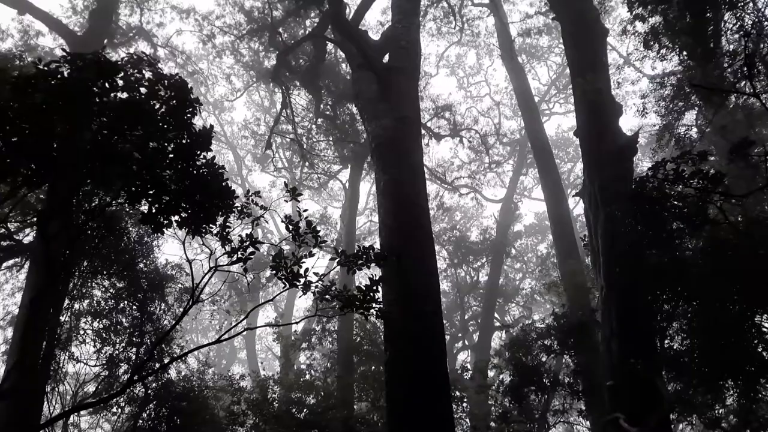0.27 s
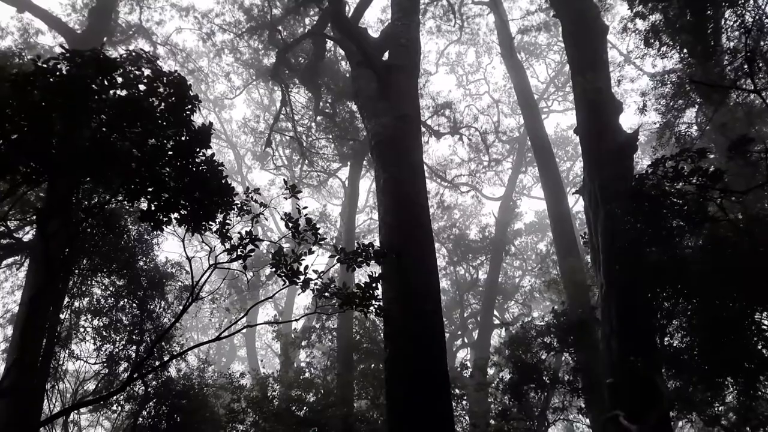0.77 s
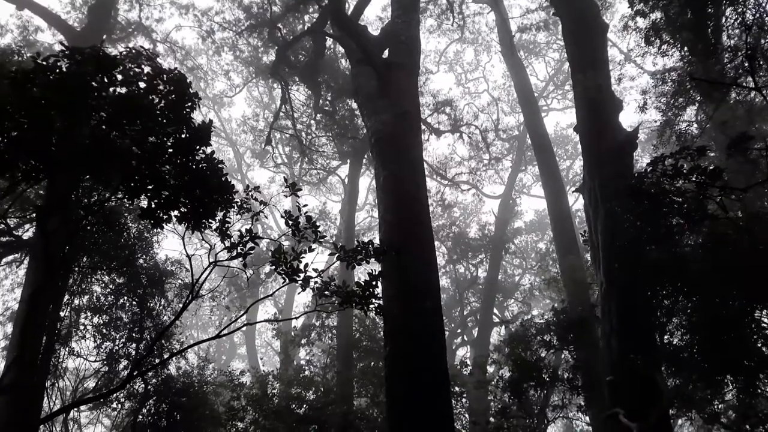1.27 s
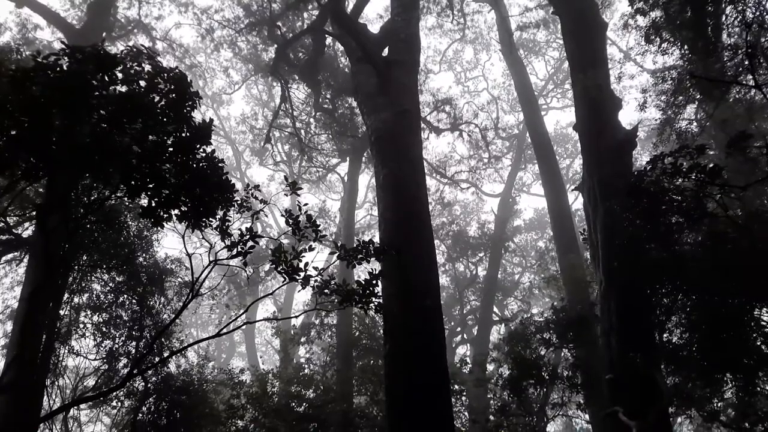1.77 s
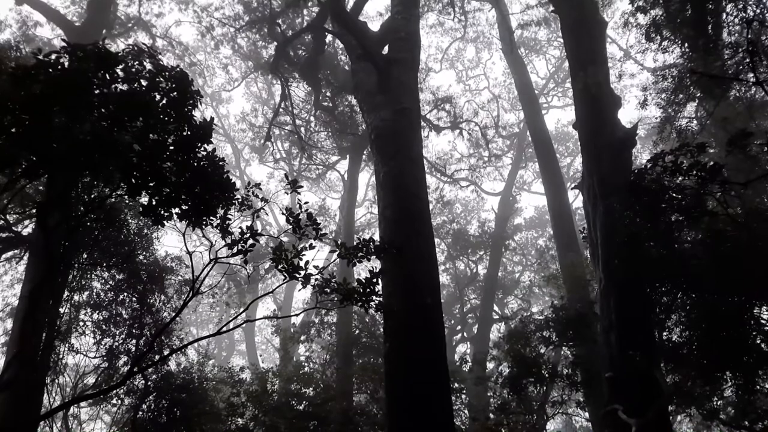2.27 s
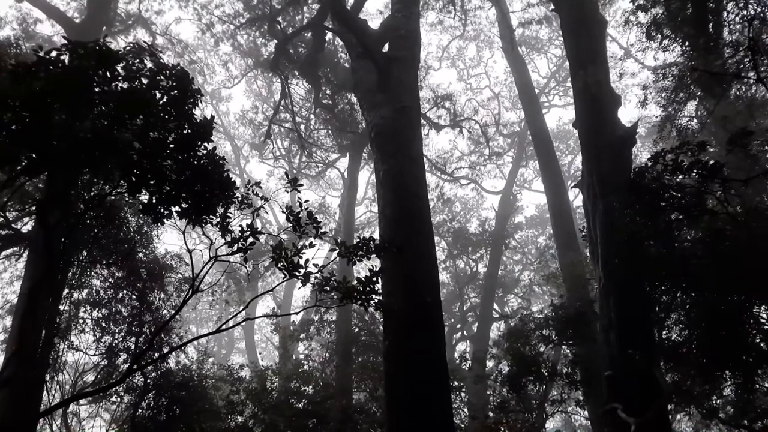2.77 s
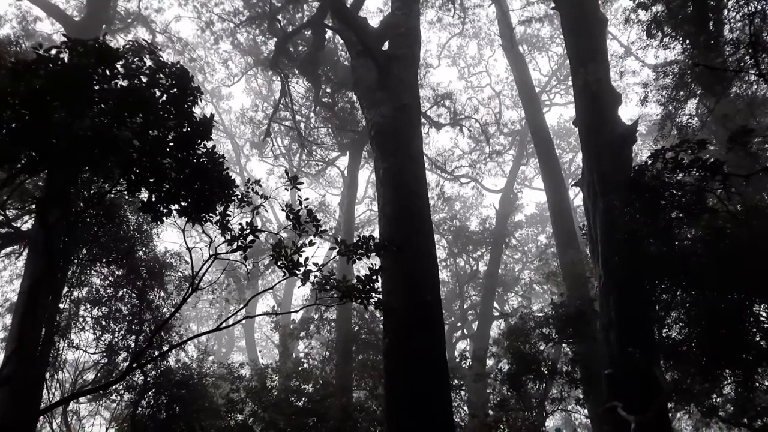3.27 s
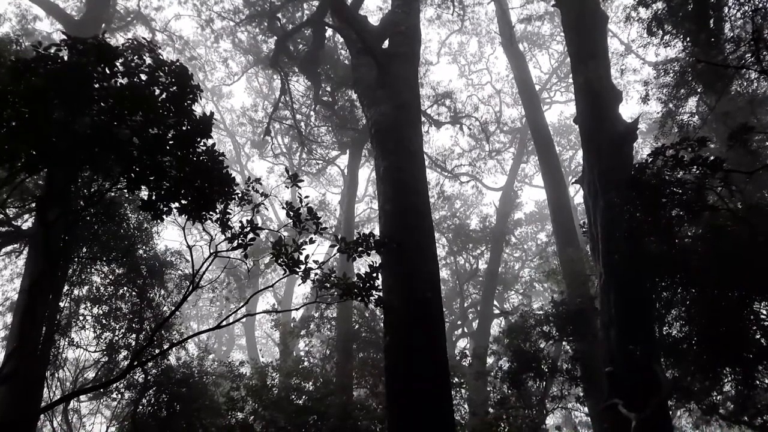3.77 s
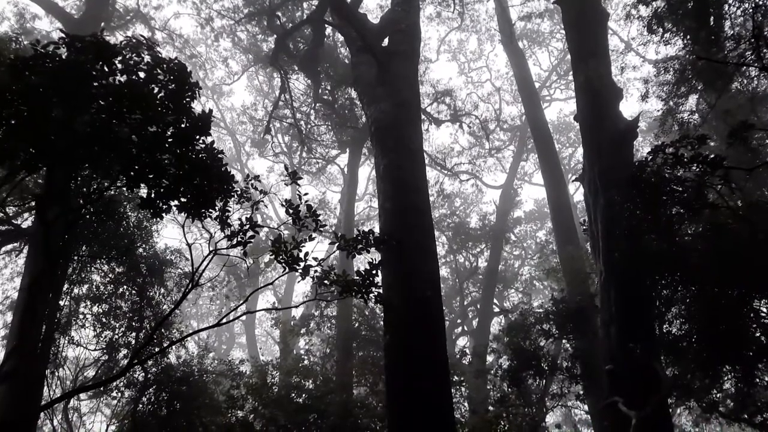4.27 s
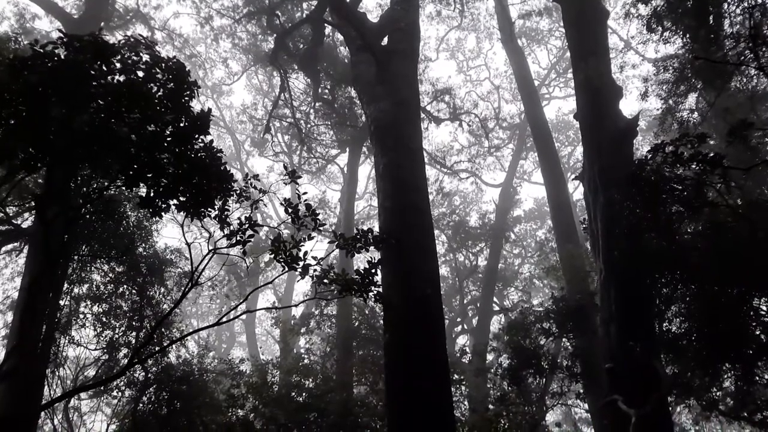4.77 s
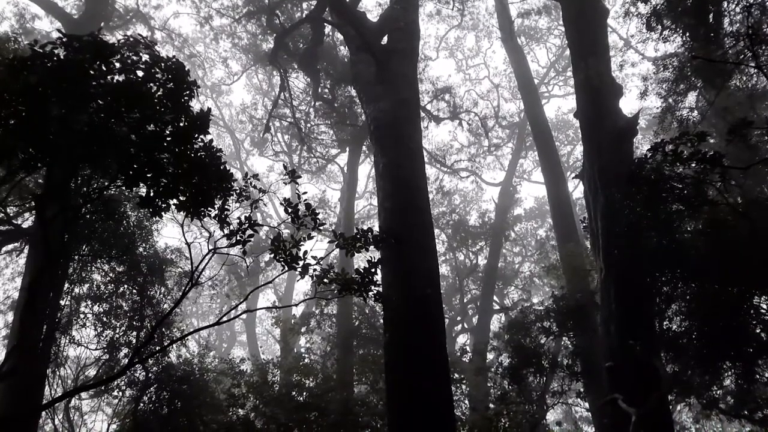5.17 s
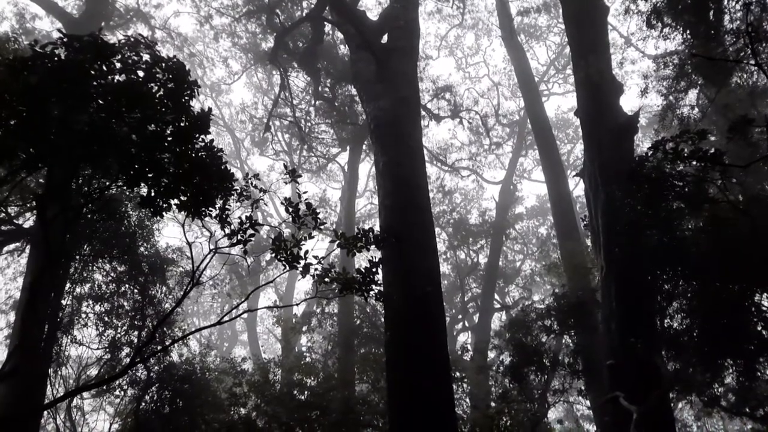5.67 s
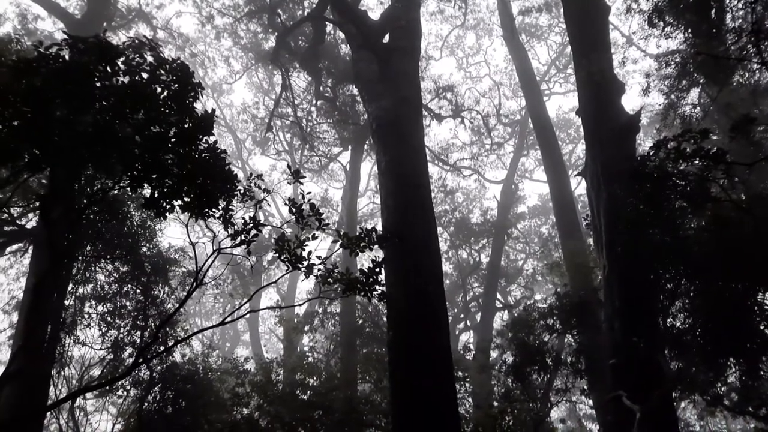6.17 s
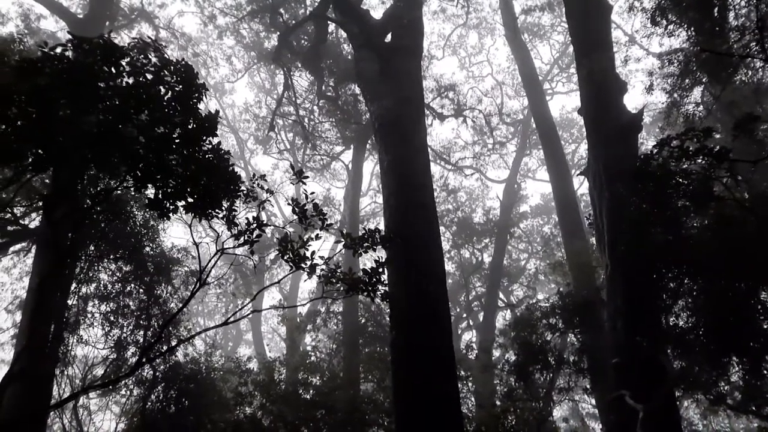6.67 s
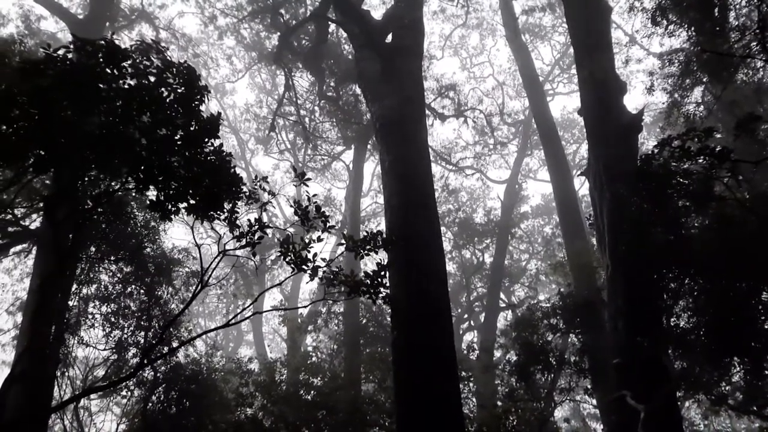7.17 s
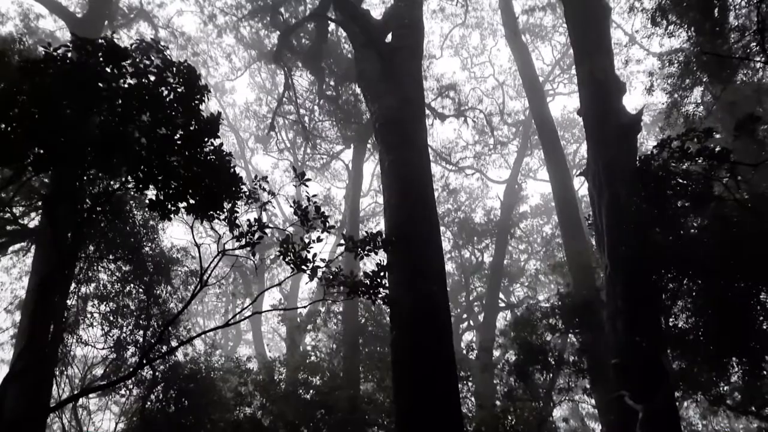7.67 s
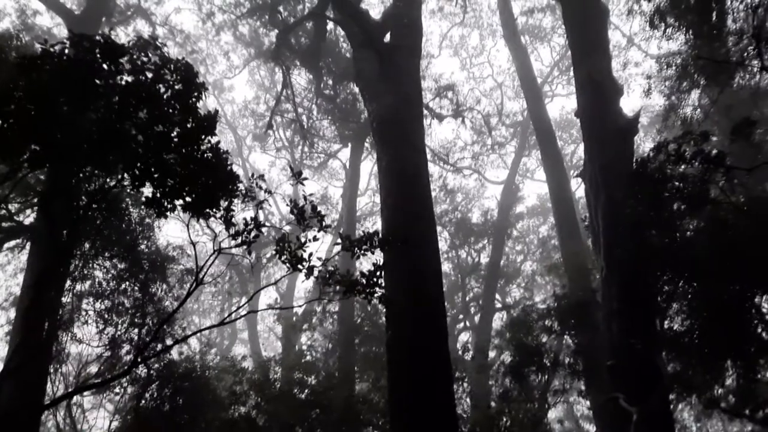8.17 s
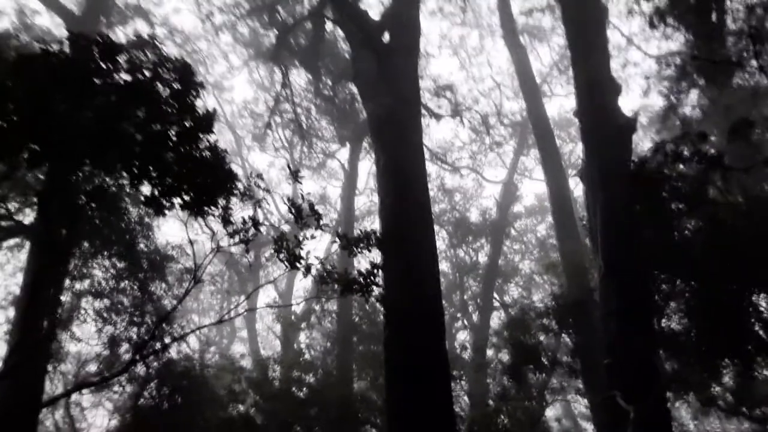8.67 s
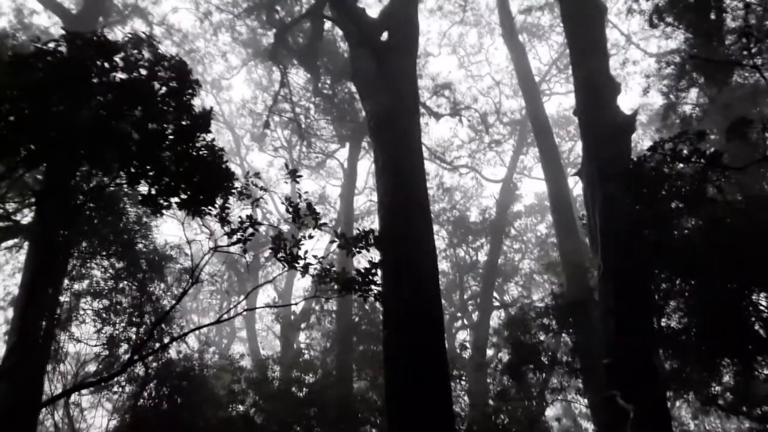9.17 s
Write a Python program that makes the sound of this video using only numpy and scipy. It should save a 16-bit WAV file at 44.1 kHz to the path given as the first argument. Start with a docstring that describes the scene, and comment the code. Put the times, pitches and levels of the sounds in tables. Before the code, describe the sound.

A quiet misty forest with breathy leaf rustle, fine crackle and a blurred chorus of distant birds. In the first 1.5 seconds a mellow thrush-like bird whistles short warbling phrases among faint high peeps and small near chirps. At about 1.7 a close bird chirps and buzzes, gives a dry clicking rattle around 1.9-2.1, then a loud, even trill of ten arched notes from 2.5 to 3.5, ending in sharp tsips. Fluted whistles return from 3.7 to 4.9; background hiss lifts slightly at 4.2. From 5 to 6.6 soft slurred far whistles, husky pips and damp drips fill the gap. A clean upslur at 6.7 leads to eight bright see-saw chirps until 8, then seven slower whip-like notes to 9.2. Whistles overlap the end, with a final quick chirp as breeze rumbles and hisses against the left microphone.

```python
"""A near songbird runs through chirps, a dry rattle and three fast trills in a misty forest.
A thrush-like bird whistles among the trunks; small far birds and a blurred chorus fill the gaps.
Bird tones are swept sines with a faint octave, sent through sparse trunk echoes and a noise tail.
Leaves and air are coloured noise, drips are decaying sines, and a breeze bumps the microphone."""
import sys
import numpy as np
from scipy import signal
from scipy.fft import rfft, irfft, next_fast_len
from scipy.io import wavfile
from scipy.ndimage import uniform_filter1d

SR = 44100
rng = np.random.default_rng(int(sys.argv[2]) if len(sys.argv) > 2 else 0)


def store_wav(level_fs):
    """Save 16-bit WAV to argv[1]."""
    pcm = np.round(np.clip(np.atleast_2d(level_fs), -1, 1) * 32767)
    wavfile.write(sys.argv[1], SR, pcm.T.astype(np.int16))


N = 414981


def from_db(db):
    """Decibels to amplitude gain."""
    return 10 ** (np.asarray(db) / 20)


def rms_one(x):
    """Scale to rms 1."""
    return x / np.sqrt(np.mean(x ** 2) + 1e-20)


def in_time(rows):
    """Interpolate each column of a curve at every sample."""
    s, *columns = np.transpose(rows)
    return [np.interp(np.arange(N) / SR, s, c) for c in columns]


def at_hz(points, hz):
    """Interpolate a spectrum on a log-frequency axis."""
    point_hz, value = np.array(points).T
    return np.interp(np.log(hz + 1e-9), np.log(point_hz), value)


def add(out, s, sound):
    """Mix a sound in at time s."""
    i = int(np.clip(round(s * SR), 0, N - 1))
    out[i:i + len(sound)] += sound[:N - i]


def drift(rate_hz):
    """Random wander: straight lines between normal knots of spread 1."""
    knots = rng.standard_normal(8192)
    return np.interp(np.arange(N) / SR * rate_hz, np.arange(len(knots)), knots)


# Left-right likeness of the noise beds: f/Hz, correlation (1 = identical)
LIKENESS = [(60, 0.28), (250, 0.68), (600, 0.56), (1200, 0.13), (3000, 0.33), (12000, 0.06)]


def noise(spectrum):
    """Stereo noise of a given colour and left-right likeness; rms 1."""
    size = next_fast_len(N)
    hz = np.arange(size // 2 + 1) * SR / size
    mid, side = rfft(rng.standard_normal((2, size)))
    alike = np.clip(at_hz(LIKENESS, hz), -1, 1)
    pair = np.sqrt(1 + alike) * mid + np.sqrt(1 - alike) * side * [[1], [-1]]
    return rms_one(irfft(pair * from_db(at_hz(spectrum, hz)), size)[:, :N])


def syrinx(hz, gain, octave_db=-46):
    """A nearly pure tone with a faint octave."""
    phase = 2 * np.pi * np.cumsum(hz) / SR
    return gain * (np.sin(phase) + from_db(octave_db) * np.sin(2 * phase))


def glide(s, length_s, first_hz, last_hz, db, depth_hz=0, rate_hz=0):
    """A note that slides evenly between two pitches, warbling if it has a depth."""
    return s, length_s, first_hz, (first_hz + last_hz) / 2, last_hz, db, depth_hz, rate_hz


def blip(s, hz, db, length_s, slide):
    """A short note that slides through its pitch by a share of it."""
    return glide(s, length_s, hz * (1 - slide / 2), hz * (1 + slide / 2), db)


def slurs(rows):
    """Notes bent through three pitches, without warble."""
    return [(*row, 0, 0) for row in rows]


def notes(rows, rise_s, fall_s, waver, hoarse, flutter_db):
    """Each note swells, bends through three pitches and may warble; fast pitch tremor makes it hoarse."""
    out, flutter = np.zeros(N), drift(70)
    wander = 1 + waver * drift(80) + hoarse * drift(600)
    for s, length_s, first_hz, middle_hz, last_hz, db, depth_hz, rate_hz in rows:
        t = np.arange(int(max(length_s, .004) * SR)) / SR
        u = t / t[-1]
        here = (int(s * SR) + np.arange(len(t))) % N
        turn = 2 * np.pi * rate_hz * t
        warble = np.sin(turn + 0.63 * np.sin(turn))   # jumps up faster than it slides down
        bend = np.polyfit([0, .5, 1], [first_hz, middle_hz, last_hz], 2)
        hz = np.polyval(bend, u) + depth_hz * warble
        rise = t / min(rise_s, t[-1] / 2)
        fall = (t[-1] - t) / min(fall_s, t[-1] / 2)
        swell = np.sin(np.pi / 2 * np.clip(np.minimum(rise, fall), 0, 1)) ** 2
        gain = swell * from_db(db + flutter_db * flutter[here])
        add(out, s, syrinx(hz * wander[here], gain))
    return out


def trill(shape, syllables, variety=0.011):
    """One syllable gesture, repeated with slight random changes of pitch."""
    out, (when, pitch, level) = np.zeros(N), np.transpose(shape)
    t = np.arange(when[0], when[-1], 1 / SR)
    for s, db, ratio in syllables:
        varied = pitch * ratio * (1 + variety * rng.standard_normal(len(pitch)))
        hz = uniform_filter1d(np.interp(t, when, varied), size=100)
        gain = from_db(db + np.interp(t, when, level)) * signal.windows.tukey(len(t), .06)
        add(out, s + when[0], syrinx(hz, gain))
    return out


def forest(x, lead_ms, pan_db, early_db, early_t60, tail_db, tail_t60):
    """Direct sound (lead and pan positive to the left), separate near-trunk echoes, long soft far tail."""
    t = np.arange(2 * SR) / SR
    trunks = rng.standard_normal((2, len(t))) * (rng.random((2, len(t))) < 900 / SR)
    early = trunks * (t > .004) * from_db(-60 * t / early_t60)
    onset = 1 - np.exp(-t / .03)
    tail = rng.standard_normal((2, len(t))) * onset * from_db(-60 * t / tail_t60)
    echoes = from_db(early_db) * rms_one(early) + from_db(tail_db) * rms_one(tail)
    echoes = echoes / np.sqrt(len(t))
    size = next_fast_len(N + len(t))
    hz, sides = np.arange(size // 2 + 1) * SR / size, np.array([[.5], [-.5]])
    direct = from_db(pan_db * sides) * np.exp(2j * np.pi * hz * sides * lead_ms / 1000)
    return irfft(rfft(x, size) * (direct + rfft(echoes, size)), size)[:, :N]


# Canopy rustle over time, before trim: t/s, level/dB
RUSTLE_LEVEL = [(0.0, -62), (0.63, -58.5), (4.01, -59.5), (5.48, -55), (6.79, -55.5), (8.86, -54),
                (9.41, -51)]
# Noise colours of rustle, hiss and low air: f/Hz, relative level/dB
RUSTLE = [(18, -62), (30, -14.5), (147, -11), (219, -22), (318, -1.5), (402, -6), (612, -3.5), (1260, -8.5),
          (1490, -7.5), (2060, -6.5), (2260, -7.5), (3140, -12), (3970, -8), (5770, -15.5), (8000, -29.5),
          (10400, -50.5), (17600, -120)]
HISS = [(3530, -37.5), (6000, -2), (8330, -2), (9290, -9), (11300, -5), (14500, -9.5), (15800, -18)]
MURMUR = [(30, -21), (90, -24), (150, 3.5), (215, 3), (280, 12), (350, -12), (700, -27), (2000, -52.5)]
STEP_S, STEP_RISE_S = 4.2, .06   # hiss and murmur step up together


def leaves(rustle_db=5.5, hiss_db=-65.0, hiss_step_db=5, hiss_fade_db=14, hiss_onset_s=0.37,
           murmur_db=-75, murmur_step_db=10.5, grain_db=1.5, swell_db=3):
    """Breathy canopy rustle, a grainy hiss that fades in above it and a low murmur of air below."""
    t, (rustle,) = np.arange(N) / SR, in_time(RUSTLE_LEVEL)
    stepped = np.clip((t - STEP_S) / STEP_RISE_S, 0, 1)
    fade = hiss_fade_db * np.clip(1 - t / hiss_onset_s, 0, 1)
    grain = grain_db * (drift(400) + .5 * drift(62))
    hiss = hiss_db + hiss_step_db * stepped - fade + grain
    murmur = murmur_db + murmur_step_db * stepped + swell_db * drift(4.8)
    air = from_db(hiss) * noise(HISS) + from_db(murmur) * noise(MURMUR)
    return from_db(rustle + rustle_db) * noise(RUSTLE) + air


# Wind puffs on the microphone ports: t/s, fade/s, left level/dB, right level/dB
PUFFS = [(5.305, 0.012, -60, -41), (5.335, 0.023, -59, -43), (5.44, 0.032, -62, -46),
         (6.725, 0.04, -63, -52), (7.554, 0.023, -65, -51), (8.39, 0.1, -70, -47),
         (8.866, 0.036, -40.5, -62), (9.071, 0.13, -45.5, -71), (9.181, 0.054, -30, -62),
         (9.28, 0.059, -57, -69), (9.376, 0.096, -35, -73)]
# Puff rumble colour: f/Hz, relative level/dB
PUFF = [(20, -41), (50, 5), (85, 2.5), (150, -3.5), (300, -17.5), (700, -23), (2000, -43)]
# Rising breeze hiss, before pan: t/s, level/dB
GUST = [(0, -115), (8.7, -70), (9.0, -61.5), (9.15, -50.5), (9.27, -45), (9.41, -52)]
# Breeze hiss colour: f/Hz, relative level/dB
GUST_COLOUR = [(300, -5), (1500, 2.5), (5000, 0.5), (9000, -1), (12000, 2), (15500, -2.5)]


def breeze(gust_pan_db=8, lumpy_db=1.5):
    """Puffs strike each port and die away in a rumble; the last gust hisses on the left."""
    t, push = np.arange(N) / SR, 0
    for s, fade_s, left_db, right_db in PUFFS:
        width_s = np.where(t < s, fade_s / 2, fade_s)   # rises twice as fast as it fades
        push = push + from_db([[left_db], [right_db]]) * np.exp(-((t - s) / width_s) ** 2)
    gust_db, = in_time(GUST)
    hiss = from_db(gust_db) * from_db([[gust_pan_db], [-gust_pan_db]]) * noise(GUST_COLOUR)
    return push * from_db(lumpy_db * drift(55)) * noise(PUFF) + hiss


def crackle(level_db=-2, per_s=170, spread_db=5, cycles=8.4, low_hz=260, high_hz=2400,
            full_db=-48.0, count=14):
    """Fine droplets ring leaves of many sizes for a few cycles; more fall as the rustle grows louder."""
    rustle, = in_time(RUSTLE_LEVEL)
    density = from_db(np.minimum(rustle - full_db, 0))   # per_s would hold at density = 1
    t, out = np.arange(SR // 25) / SR, np.zeros((2, N))
    for hz in np.geomspace(low_hz, high_hz, count):
        ring = np.sin(2 * np.pi * hz * t) * from_db(-60 * t * hz / cycles)   # -60 dB after `cycles`
        for when, chance, size, side in rng.random((256, 4)):
            if chance < per_s * N / SR / count / 256 * density[int(when * N)]:
                drop = ring * from_db(spread_db * min(-np.log(1 - size), 3.5))
                add(out[0], when * N / SR, drop * np.sqrt(side))
                add(out[1], when * N / SR, drop * np.sqrt(1 - side))
    return from_db(rustle + level_db) * density * rms_one(out)


def fine_grains(level_db=-71, per_s=220, spread_db=4.0, cycles=30, low_hz=3800, high_hz=12500,
                calm_db=-7, left_db=5.0, count=24):
    """Sparse, short high-pitched grains speckle the hiss, louder after the background steps up."""
    out, t = np.zeros((2, N)), np.arange(SR // 50) / SR
    pitches = np.geomspace(low_hz, high_hz, count)
    for when, chance, height, size, side in rng.random((4096, 5)):
        if chance < per_s * N / SR / 4096:
            s, hz = when * N / SR, pitches[int(height * count)]
            db = spread_db * min(-np.log(1 - size), 3) + calm_db * (s < STEP_S)
            grain = np.sin(2 * np.pi * hz * t) * from_db(db - 60 * t * hz / cycles)
            add(out[0], s, grain * np.sqrt(side))
            add(out[1], s, grain * np.sqrt(1 - side))
    return from_db([[level_db + left_db], [level_db - left_db]]) * rms_one(out)


# Drops on the leaf litter, and a low thump under the wind puff at 8.39 s, before onset and low-pass: t/s,
# level/dB, f/Hz
DRIPS = [(4.436, -45, 687), (4.737, -46.5, 557), (4.808, -42.5, 1263), (5.215, -46, 576), (5.297, -39, 313),
         (5.426, -42.5, 936), (5.716, -47, 750), (5.887, -47, 324), (6.098, -42.5, 984),
         (6.133, -43.5, 730), (7.194, -47, 708), (7.577, -42.5, 870), (7.686, -45, 1320),
         (7.752, -40.5, 740), (8.385, -41.5, 154), (8.443, -41.5, 377), (8.873, -39, 790)]
# Tiny sharp ticks, before trim: t/s, level/dB
TICKS = [(0.565, -40), (1.3634, -47), (1.584, -42), (1.716, -31), (2.137, -39), (2.6101, -34),
         (2.7815, -39), (3.0016, -41), (5.125, -33), (5.35, -36), (5.972, -35.5), (6.093, -30.5),
         (6.9473, -36), (7.471, -38), (8.0394, -35), (8.408, -34), (8.525, -29.5)]


def drips(drop_t60=0.1, splat=0.19, tick_db=-9.0, tick_t60=0.0098, patter_db=-54.0, count=90):
    """Mist falls from the canopy as soft ragged plops, a few loud and many faint, among tiny ticks."""
    out, t = np.zeros(N), np.arange(SR // 8) / SR
    start_s = DRIPS[0][0]
    drops = list(DRIPS)
    for when, loud, height in rng.random((count, 3)):
        s = start_s + when * (N / SR - start_s)
        drops.append((s, patter_db + 9 * loud, 450 * 3.8 ** height))
    for s, db, hz in drops:
        ragged = splat / 2 * np.cumsum(rng.standard_normal(len(t)))
        gain = from_db(db - 60 * t / drop_t60) * (1 - np.exp(-t / 0.00061))
        add(out, s, gain * np.sin(2 * np.pi * hz * t + ragged))
    out = signal.sosfilt(signal.butter(2, 2000, fs=SR, output="sos"), out)   # soft litter dulls them
    for s, db in TICKS:
        add(out, s, from_db(db + tick_db - 60 * t / tick_t60) * rng.standard_normal(len(t)))
    return forest(out, lead_ms=0, pan_db=-8.5, early_db=-6.5, early_t60=0.27, tail_db=-23, tail_t60=.7)


def chorus(level_db=-73, low_hz=2600, high_hz=4600, bend=.13, warble_hz=110, first_s=0.54, count=240):
    """Countless distant birds blur into a murmur of slurred, warbling notes."""
    rows = []
    for when, span, height, loud, scoop, slide, speed in rng.random((count, 7)):
        s, length_s = first_s + when * (N / SR - first_s), 0.049 + 0.13 * span
        hz = low_hz + (high_hz - low_hz) * height
        first_hz = hz * (1 + bend * (2 * scoop - 1))
        last_hz = hz * (1 + bend * (2 * slide - 1))
        db, rate_hz = level_db - 6 * loud, 20 + 40 * speed
        rows.append((s, length_s, first_hz, hz, last_hz, db, warble_hz, rate_hz))
    song = notes(rows, rise_s=0.022, fall_s=0.021, waver=0.0118, hoarse=0.011, flutter_db=3.0)
    return forest(song, lead_ms=0, pan_db=9.0, early_db=19.5, early_t60=0.14, tail_db=7.5, tail_t60=1.0)


# All bird levels below are relative to the bird's level_db.
# Thin peeps of one shape: start t/s, f/Hz, level/dB
FAR_PEEPS = [(0, 6160, -49), (0.104, 3840, -47), (2.401, 6180, -53.5), (2.554, 5350, -51.5),
             (2.566, 3870, -43.5), (2.795, 5920, -56), (2.819, 4880, -42.5), (3.001, 5730, -52),
             (3.010, 5040, -47), (3.249, 6400, -57), (3.368, 5460, -53)]
# Warbles of one depth: start t/s, length/s, first f/Hz, last f/Hz, level/dB
FAR_WARBLES = [(0.05, 0.047, 7300, 6600, -50), (0.7, 0.099, 4350, 4010, -51.5),
               (0.599, 0.37, 7200, 7330, -69), (0.788, 0.19, 2860, 3580, -53),
               (0.856, 0.16, 3840, 4590, -52), (1.036, 0.22, 4200, 3270, -62),
               (1.066, 0.095, 4900, 5050, -40), (1.172, 0.074, 4630, 4560, -37),
               (1.219, 0.23, 3980, 3890, -49.5), (1.262, 0.08, 5320, 5250, -49.5),
               (1.284, 0.2, 4880, 4620, -47.5), (1.616, 0.13, 3820, 3660, -46),
               (1.957, 0.23, 7090, 7060, -61), (2.263, 0.15, 4520, 4560, -44),
               (3.761, 0.62, 7530, 7130, -66.5), (4.282, 0.17, 3865, 3860, -54),
               (5.646, 0.035, 3840, 3920, -39.5), (5.699, 0.065, 3600, 3120, -49.5),
               (5.82, 0.08, 2550, 2610, -51), (6.44, 0.14, 4580, 3800, -52), (7.977, 0.18, 4130, 3930, -47)]


def far_birds(level_db=-4, peep_s=0.0595, peep_droop=0.043, warble_depth_hz=115):
    """Thin high calls, drooping or warbling, mostly echo."""
    calls = [blip(s, hz, db, peep_s, -peep_droop) for s, hz, db in FAR_PEEPS]
    for row in FAR_WARBLES:
        calls.append(glide(*row, warble_depth_hz, rate_hz=46 * rng.uniform(.8, 1.6)))
    song = notes(calls, rise_s=0.012, fall_s=0.016, waver=0.008, hoarse=0.009, flutter_db=2.5)
    return from_db(level_db) * forest(song, lead_ms=0.012, pan_db=-7.0, early_db=6.0, early_t60=0.13,
                                      tail_db=4.5, tail_t60=1.3)


# Slurs: start t/s, length/s, first f/Hz, middle f/Hz, last f/Hz, level/dB
FAR_SLURS = [ (.105, 0.067, 2280, 2430, 2750, -58), (0.398, 0.062, 3990, 3960, 3890, -49),
             (.603, 0.097, 4340, 4380, 4370, -44.5), (3.500, 0.075, 6010, 5960, 5730, -56),
             (3.870, 0.1, 3320, 3560, 3570, -55), (3.925, 0.09, 3500, 3190, 3190, -51),
             (3.895, 0.13, 3970, 4070, 4010, -52.5), (4.100, 0.12, 3320, 3670, 3770, -52),
             (4.185, 0.023, 3850, 3610, 3350, -44), (4.225, 0.087, 3700, 3720, 3800, -53),
             (5.135, 0.096, 3100, 3254, 3360, -47), (5.162, 0.074, 4270, 3860, 3610, -48.5),
             (5.232, 0.045, 4100, 4150, 4040, -52), (5.235, 0.074, 3300, 3290, 3280, -43.5),
             (5.365, 0.023, 2790, 2790, 2780, -42.5), (5.375, 0.025, 3580, 3620, 3540, -54),
             (5.500, 0.042, 3560, 3520, 3630, -45), (5.505, 0.06, 4020, 4100, 4180, -53),
             (5.522, 0.049, 3300, 3200, 3210, -50), (5.612, 0.035, 3870, 3760, 3670, -46),
             (5.750, 0.028, 4270, 4270, 4300, -49), (6.025, 0.028, 4270, 4220, 4070, -43),
             (6.070, 0.049, 3820, 3740, 3820, -50), (6.458, 0.08, 4230, 4110, 4090, -49.5),
             (6.530, 0.027, 3800, 3700, 3680, -42), (6.585, 0.07, 4580, 4810, 5030, -51)]


def far_whistler(level_db=-2.0):
    """Soft slurred whistles that carry clearly between the trunks and leave a tail."""
    song = notes(slurs(FAR_SLURS), rise_s=0.006, fall_s=0.0045, waver=0.0037, hoarse=0.01,
                 flutter_db=-0.5)
    return from_db(level_db) * forest(song, lead_ms=0.012, pan_db=-7.0, early_db=-1, early_t60=0.16,
                                      tail_db=-2.5, tail_t60=0.82)


# Row of pips on one pitch: start t/s, level/dB
PIPS = [(5.574, -40.5), (5.699, -39), (5.794, -40), (5.906, -39.5), (6.020, -41)]


def pipping_bird(level_db=4.5, pip_s=0.036, pip_hz=2300, pip_rise=0.053):
    """Soft, slightly rising, husky pips, blurred by the near trunks."""
    pips = [blip(s, pip_hz, db, pip_s, pip_rise) for s, db in PIPS]
    song = notes(pips, rise_s=0.014, fall_s=0.018, waver=0.0075, hoarse=0.032, flutter_db=2.5)
    return from_db(level_db) * forest(song, lead_ms=-0.078, pan_db=4.0, early_db=-3.0, early_t60=0.27,
                                      tail_db=-7, tail_t60=1.0)


# Fluted whistles: start t/s, length/s, first f/Hz, middle f/Hz, last f/Hz, level/dB
THRUSH_WHISTLES = [ (.125, 0.062, 1160, 1360, 1420, -54.5), (.170, 0.083, 1392, 1530, 1610, -43.5),
                   (.229, 0.04, 1530, 1793, 1350, -40.5), (.451, 0.082, 2334, 2259, 2305, -30),
                   (.612, 0.09, 1992, 1855, 1830, -38.5), (.970, 0.058, 2145, 2333, 2375, -32),
                   (.995, 0.078, 2355, 2294, 2045, -31.5), (3.620, 0.11, 1206, 1290, 1370, -63),
                   (3.715, 0.1, 1387, 1475, 1437, -49.5), (3.755, 0.085, 2614, 2770, 2700, -42),
                   (3.892, .036, 1860, 2050, 1770, -32.5), (3.916, 0.061, 2000, 1644, 2050, -36.5),
                   (4.070, 0.077, 2107, 2093, 1905, -29.5), (4.265, 0.061, 2590, 2745, 2740, -38),
                   (4.304, 0.12, 2090, 1938, 1667, -33.5), (4.398, 0.063, 1710, 1586, 1670, -42),
                   (4.468, 0.0448, 2242, 2478, 2550, -29), (4.492, 0.085, 2510, 2447, 2374, -28.5),
                   (4.664, 0.1, 2233, 2246, 2210, -30), (4.775, 0.089, 2760, 2760, 2815, -41),
                   (8.674, 0.11, 2160, 2273, 2160, -42), (8.754, 0.1, 1600, 1784, 1640, -40.5),
                   (8.812, 0.05, 1700, 1573, 1700, -43.5), (8.935, 0.115, 1993, 2017, 1900, -34.5),
                   (9.036, 0.1, 1918, 1772, 1670, -39)]
# Warbles: start t/s, length/s, first f/Hz, last f/Hz, level/dB, depth/Hz, rate/Hz
THRUSH_WARBLES = [ (0.261, 0.11, 1880, 1976, -36.5, 288, 39), (0.516, 0.12, 2164, 1930, -34.5, 171, 76),
                  (1.065, 0.11, 2169, 2900, -38, 280, 53), (3.969, .1, 2100, 2250, -33, 81, 49),
                  (4.571, 0.097, 2358, 2219, -31.5, 60, 39.3), (9.215, 0.064, 2630, 2550, -31, 149, 137),
                  (9.274, 0.043, 2526, 2352, -28.5, 190, 115)]
# Short drooping grace notes: start t/s, f/Hz, level/dB
GRACE_NOTES = [(0.954, 2834, -37.5), (1.352, 2560, -48), (3.835, 2380, -31.5), (3.881, 2504, -34.5),
               (4.341, 2360, -34.5), (4.859, 2458, -34.5)]


def thrush(level_db=4.5, grace_s=0.026, grace_droop=0.11):
    """Fluted phrases from further off on the right."""
    graces = [blip(s, hz, db, grace_s, -grace_droop) for s, hz, db in GRACE_NOTES]
    calls = slurs(THRUSH_WHISTLES) + [glide(*row) for row in THRUSH_WARBLES] + graces
    song = notes(calls, rise_s=0.012, fall_s=0.012, waver=0.004, hoarse=0.005, flutter_db=1.0)
    return from_db(level_db) * forest(song, lead_ms=-0.076, pan_db=-0.2, early_db=-3.5, early_t60=0.12,
                                      tail_db=-6, tail_t60=1.4)


# Scoop, hold and lift: t from start/s, f/Hz, relative level/dB
UPSLUR = [(0, 2200, -13), (.005, 2610, 0.5), (.010, 2720, 2.5), (.028, 2713, 0.5), (.042, 2756, -5),
          (.070, 2780, 0), (.092, 2880, -4), (.110, 3130, -1.5), (.130, 3233, -2), (.137, 3250, -22)]
# Its start: t/s, level/dB, pitch ratio
UPSLURS = [(6.669, -32.5, 0.99)]


def rising_whistle(level_db=3.5):
    """One clean, dry upslur of the near bird announces the see-saw chirps."""
    song = trill(UPSLUR, UPSLURS, variety=.002)
    return from_db(level_db) * forest(song, lead_ms=0.067, pan_db=-2.0, early_db=-10.5, early_t60=0.18,
                                      tail_db=-20.5, tail_t60=1.2)


# Double-snap ticks: t/s, level/dB, f/Hz, gap between snaps/s
RATTLE = [(1.920, -44.5, 2270, .0013), (1.945, -33, 2250, .0013), (1.968, -32, 2400, .0017),
          (1.991, -31.5, 2310, .0017), (2.015, -34, 2230, .0022), (2.039, -31, 2280, .0036),
          (2.064, -33.5, 2090, .0038), (2.0895, -37, 2170, .0041)]


def rattle(snap_s=0.0013, rasp=0.084, fall=0.042):
    """Each tick is two raspy snaps a few cycles long, which draw apart as the rattle goes on."""
    out, tremor = np.zeros(N), drift(1500)
    u = np.linspace(-3, 3, int(6 * snap_s * SR))
    for s, db, hz, gap_s in RATTLE:
        for when in (s - gap_s / 2, s + gap_s / 2):
            pitch = hz * (1 - fall * u + rasp * tremor[int(when * SR):][:len(u)])
            add(out, when - len(u) / SR / 2, syrinx(pitch, from_db(db) * np.exp(-u * u)))
    return out


# Two-part chirps: turn t/s, fall level/dB, peak f/Hz, upstroke bow (1 = straight),
# fall first f/Hz, fall last f/Hz, fall length/s
SEE_SAWS = [(6.929, -26.5, 5380, 0.97, 4850, 3850, .049), (7.083, -24.5, 5380, .95, 4420, 3720, 0.058),
            (7.243, -22, 5670, 1.4, 4620, 3680, 0.054), (7.384, -22, 5350, 0.93, 4280, 3644, .045),
            (7.524, -22, 5470, 1.06, 4480, 3720, 0.05), (7.664, -22.5, 5510, 0.97, 4370, 3686, 0.05),
            (7.795, -22, 5370, 0.76, 4220, 3660, .046), (7.940, -20.5, 5180, 1, 4110, 3585, 0.045)]


def see_saws(up_s=.04, up_hz=4400, up_db=-28, up_fade_db=4, flattens=1.5, loudest=0.56, swell_db=9):
    """Each chirp climbs and thins out, then breaks to a lower note that swells while its fall flattens."""
    out = np.zeros(N)
    for s, db, peak_hz, bow, first_hz, last_hz, length_s in SEE_SAWS:
        u = np.linspace(0, 1, int(up_s * SR))
        gain = from_db(up_db - up_fade_db * u) * signal.windows.tukey(len(u), .3)
        add(out, s - up_s, syrinx(up_hz + (peak_hz - up_hz) * u ** bow, gain))
        u = np.linspace(0, 1, int(length_s * SR))
        sag = (1 - np.exp(-flattens * u)) / (1 - np.exp(-flattens))
        swell = -swell_db * (u / loudest - 1) ** 2   # loudest at this share of the fall
        gain = from_db(db + swell) * signal.windows.tukey(len(u), .22)
        add(out, s, syrinx(first_hz + (last_hz - first_hz) * sag, gain, octave_db=-39))
    return out


# Upward scoop, then sharp downward flick: t from apex/s, f/Hz, relative level/dB
TSIP = [(-.018, 3170, -23), (-.010, 3410, -10.5), (-.003, 3570, -7), (-.001, 5930, -25), (0, 6910, -10.5),
        (.003, 4900, -2.5), (.006, 4130, -6), (.009, 3680, -23)]
# Sung tsips: apex t/s, level/dB, pitch ratio
TSIPS = [(3.596, -27.5, 0.99), (3.64, -30.5, 0.94), (3.691, -31.5, 1.06)]


def tsips(rasp_lead_s=0.024, rasp_s=0.029, rasp_hz=5030, rasp_db=-12.5):
    """Scoop-and-flick notes, each with a faint hoarse rasp around it."""
    rasps = [glide(s - rasp_lead_s, rasp_s, rasp_hz, rasp_hz, db + rasp_db) for s, db, _ in TSIPS]
    return trill(TSIP, TSIPS) + notes(rasps, rise_s=0.004, fall_s=0.0073, waver=0.0043, hoarse=0.21,
                                      flutter_db=0.5)


# Slurred chirps: start t/s, length/s, first f/Hz, middle f/Hz, last f/Hz, level/dB
NEAR_CHIRPS = [ (.060, 0.16, 5360, 5230, 4940, -38.5), (.824, 0.025, 2600, 3070, 3800, -40),
               (.838, 0.035, 2120, 2640, 2360, -34), (.862, 0.029, 4290, 3030, 2590, -38),
               (1.472, 0.031, 3130, 3500, 4220, -37), (1.732, 0.036, 2310, 3300, 3440, -35.5),
               (1.750, 0.078, 3550, 3180, 2650, -29), (2.160, 0.097, 5820, 5050, 4830, -43.5),
               (2.171, 0.087, 4930, 4145, 3920, -34), (2.299, 0.014, 3300, 4730, 6840, -29),
               (2.306, 0.029, 3550, 4600, 4530, -33.5), (2.381, 0.019, 2190, 1510, 1420, -45),
               (2.414, 0.055, 1505, 1804, 1510, -33), (9.319, 0.024, 4270, 3900, 2760, -22.5),
               (9.340, 0.042, 3240, 2400, 3230, -21.5), (9.378, 0.03, 2760, 3240, 3370, -29)]
# Buzzes: start t/s, length/s, first f/Hz, last f/Hz, level/dB, warble depth/Hz, warble rate/Hz
NEAR_BUZZES = [(1.702, 0.031, 4260, 3770, -32.5, 344, 170), (9.291, 0.031, 4560, 4260, -28, 650, 72)]


def chirps_and_buzzes():
    """Short bent notes, and fast-warbling hoarser ones."""
    chirps = notes(slurs(NEAR_CHIRPS), rise_s=0.0063, fall_s=0.006, waver=0.0032, hoarse=0.012,
                   flutter_db=2.7)
    buzzes = notes([glide(*row) for row in NEAR_BUZZES], rise_s=0.0074, fall_s=0.0017, waver=0.0052,
                   hoarse=0.037, flutter_db=3.5)
    return chirps + buzzes


# Syllable shapes (arch, whip, soft coo trailing each whip): t from apex/s, f/Hz, relative level/dB
ARCH = [(-.023, 2020, -18.5), (-.018, 1950, -8.5), (-.012, 2135, -4), (-.007, 2505, 0), (0, 2701, -1),
        (.008, 2428, -1.5), (.013, 2040, -4), (.018, 1714, -11.5), (.026, 1477, -27.5), (.036, 1464, -30.5)]
WHIP = [(-.026, 2000, -22), (-.021, 2148, -6.5), (-.014, 2508, -3.5), (-.008, 2754, -4), (-.004, 2934, -27),
        (-.001, 3804, -8.5), (.002, 3400, -15), (.006, 2730, -4.5), (.010, 2340, -8.5), (.014, 1820, -19)]
COO = [(.019, 1820, -31), (.024, 1712, -21), (.034, 1583, -25), (.060, 1563, -23.5), (.087, 1510, -28.5),
       (.097, 1468, -34)]
# Sung syllables: apex t/s, level/dB, pitch ratio
ARCHES = [(2.54, -17.5, 1.02), (2.646, -18, 1.018), (2.750, -17.5, 1.02), (2.854, -18.5, 1.003),
          (2.956, -18, 1), (3.059, -17.5, 1.003), (3.16, -18, 1.0), (3.263, -17.5, 1.014),
          (3.366, -17.5, 1.008), (3.477, -18, 1.008)]
WHIPS = [(8.071, -17, 0.95), (8.260, -16, 0.99), (8.447, -16.5, 1.017), (8.620, -16.5, 0.97),
         (8.796, -17, 0.99), (8.964, -16, 0.98), (9.142, -16.5, 0.99)]


def near_bird(level_db=3.0):
    """Chirps, buzzes, a rattle and three trills from a close perch; the left port hears it first."""
    whips = trill(WHIP, WHIPS) + trill(COO, WHIPS, variety=0.004)
    trills = trill(ARCH, ARCHES) + see_saws() + whips
    song = trills + rattle() + tsips() + chirps_and_buzzes()
    return from_db(level_db) * forest(song, lead_ms=0.064, pan_db=-0.8, early_db=-8.5, early_t60=0.13,
                                      tail_db=-17.0, tail_t60=2.6)


def scene():
    """Birds near and far over the sounds of the trees."""
    background = leaves() + breeze() + crackle() + fine_grains() + drips()
    far = chorus() + far_birds() + far_whistler()
    return background + far + pipping_bird() + thrush() + rising_whistle() + near_bird()


def record(dry):
    """A steep elliptic low-pass cuts the top."""
    return signal.sosfilt(signal.ellip(12, .1, 80, 15850, fs=SR, output="sos"), dry)


dry = scene()
out = record(dry)
store_wav(out)
```